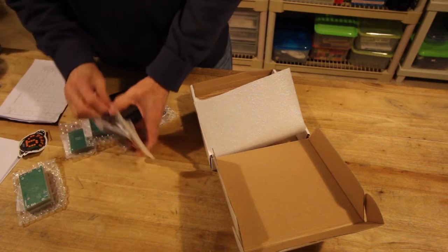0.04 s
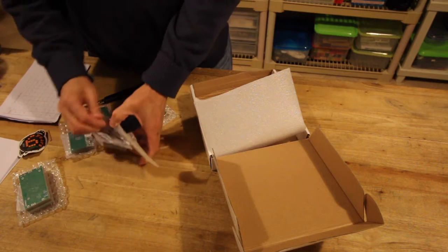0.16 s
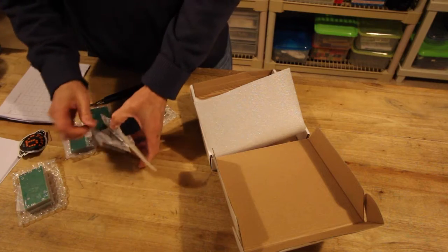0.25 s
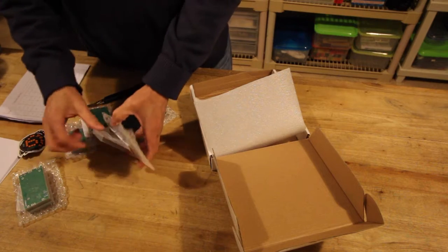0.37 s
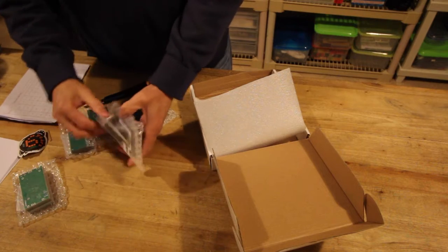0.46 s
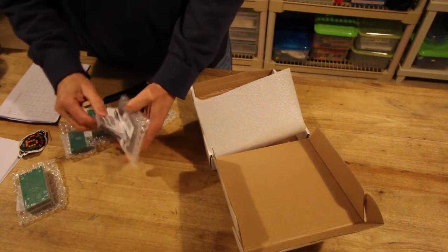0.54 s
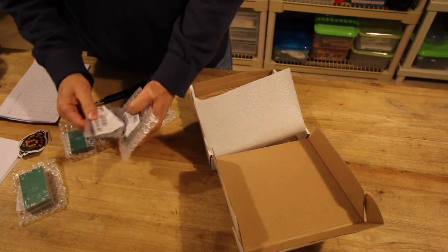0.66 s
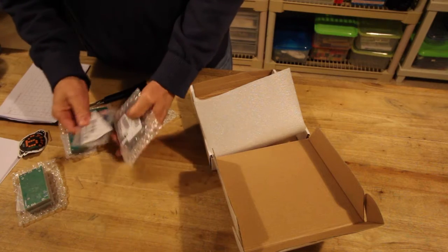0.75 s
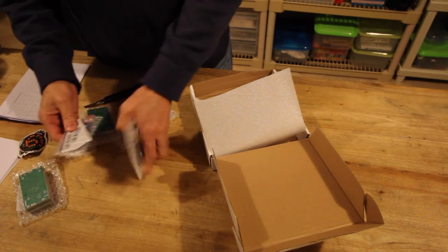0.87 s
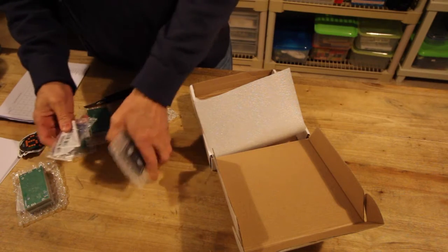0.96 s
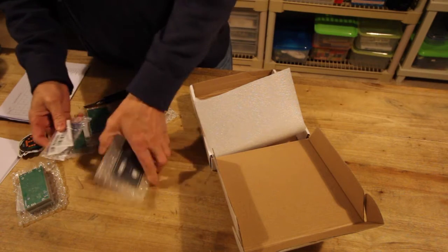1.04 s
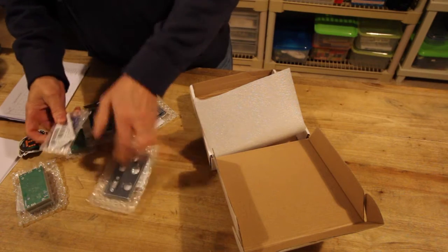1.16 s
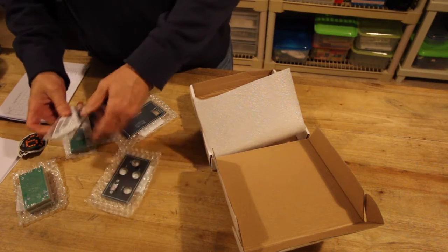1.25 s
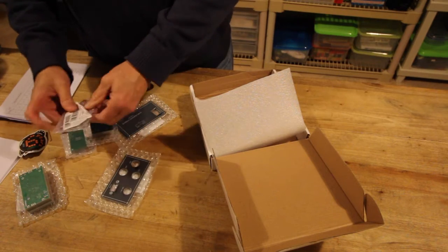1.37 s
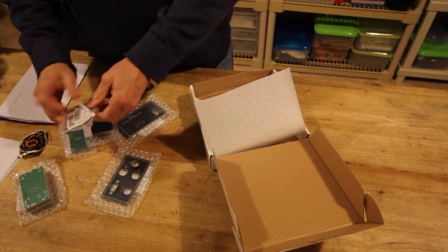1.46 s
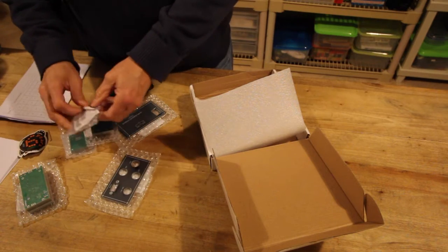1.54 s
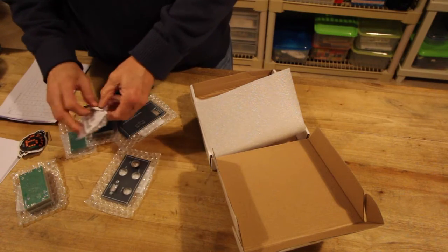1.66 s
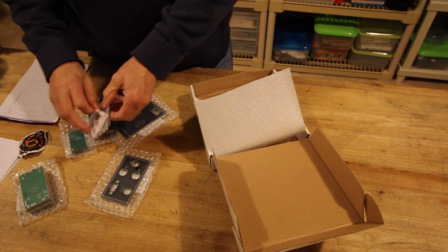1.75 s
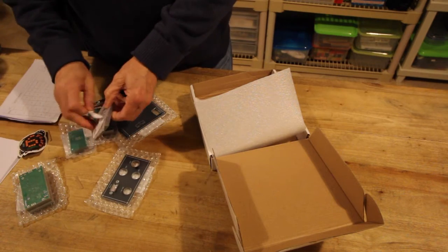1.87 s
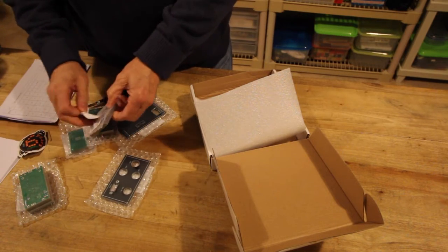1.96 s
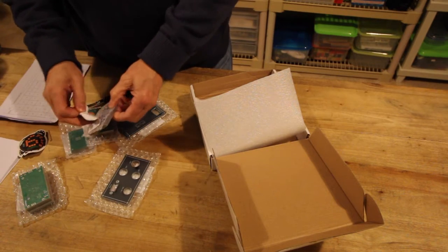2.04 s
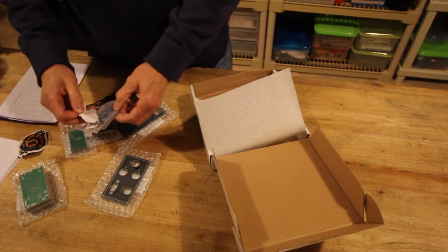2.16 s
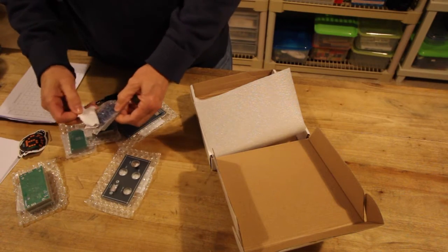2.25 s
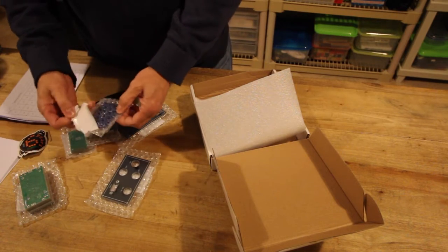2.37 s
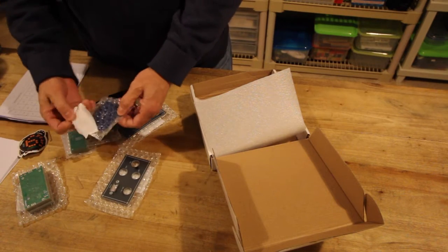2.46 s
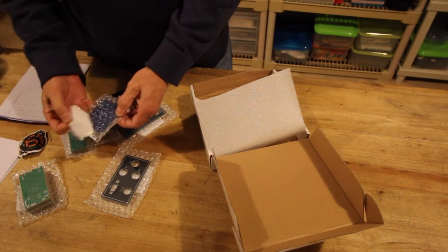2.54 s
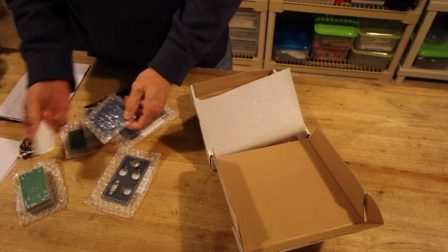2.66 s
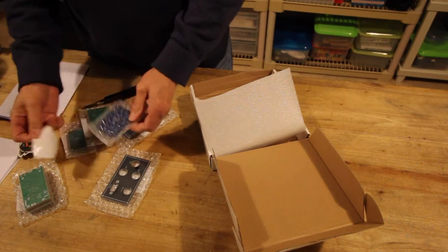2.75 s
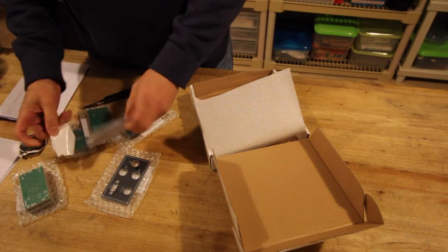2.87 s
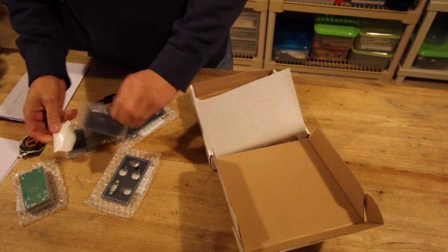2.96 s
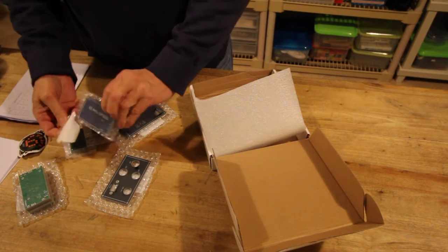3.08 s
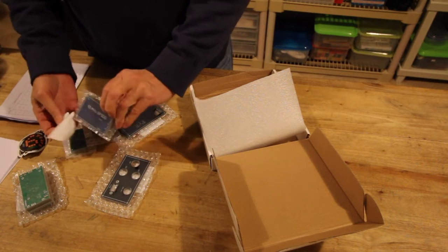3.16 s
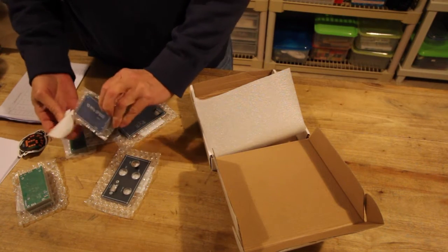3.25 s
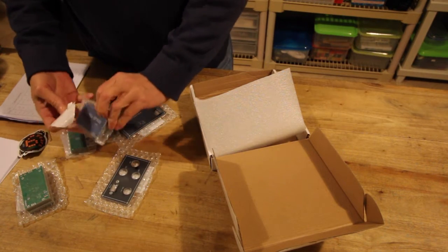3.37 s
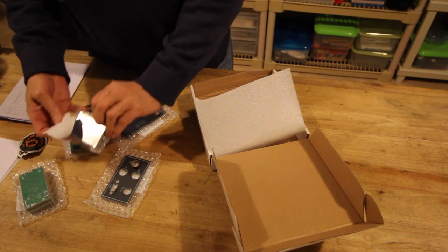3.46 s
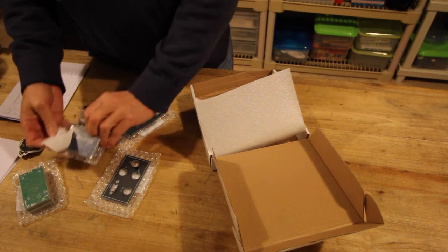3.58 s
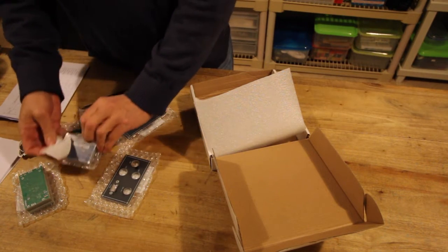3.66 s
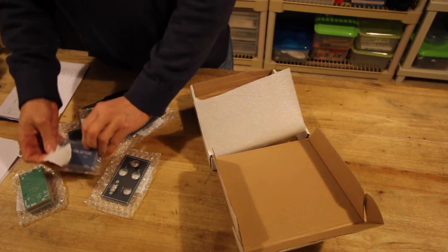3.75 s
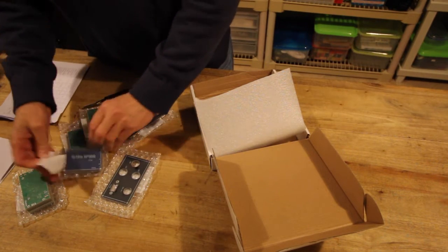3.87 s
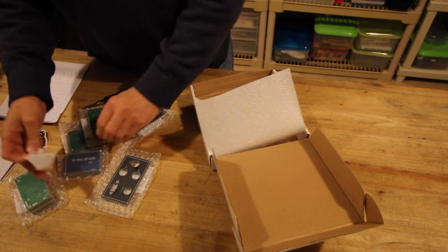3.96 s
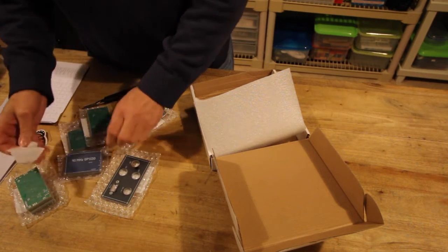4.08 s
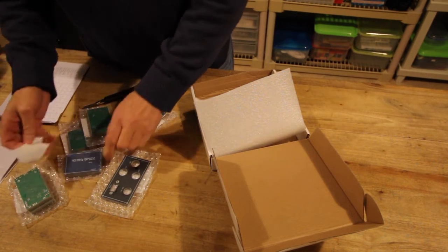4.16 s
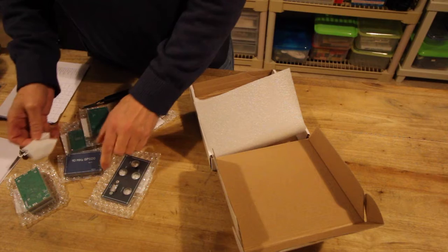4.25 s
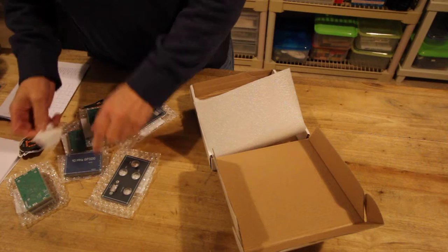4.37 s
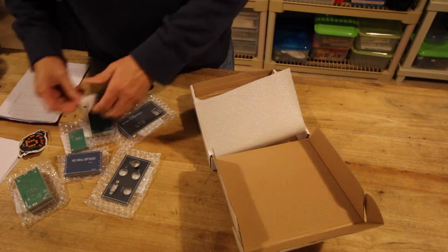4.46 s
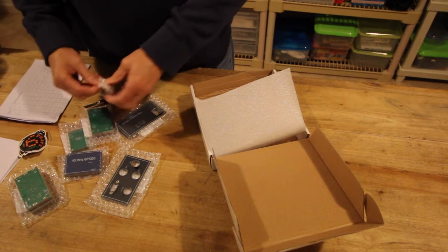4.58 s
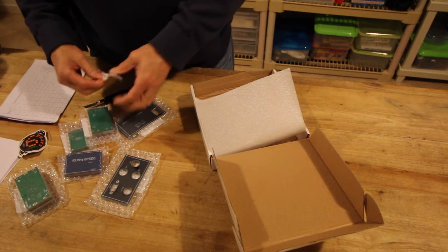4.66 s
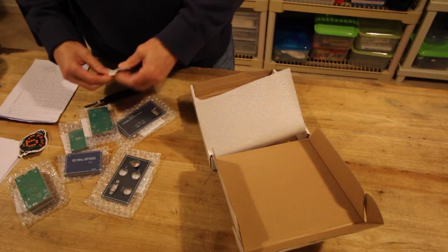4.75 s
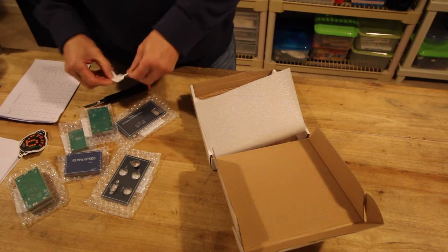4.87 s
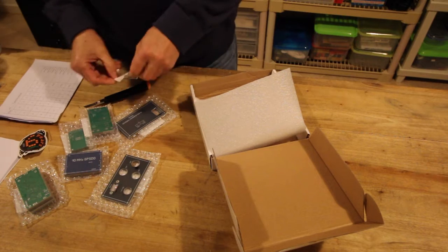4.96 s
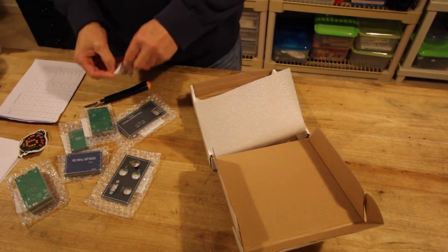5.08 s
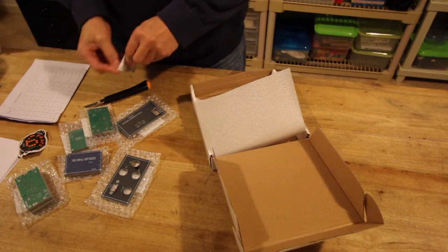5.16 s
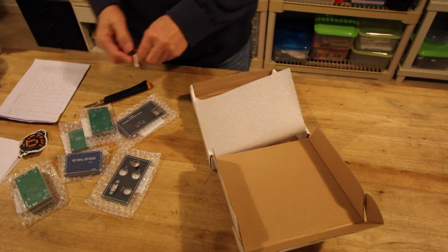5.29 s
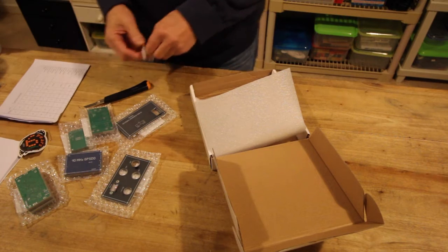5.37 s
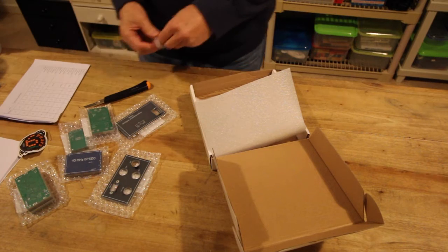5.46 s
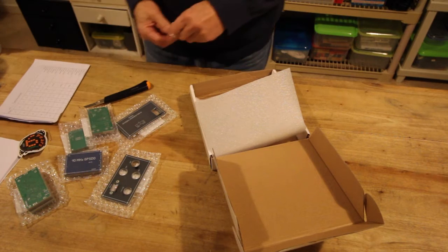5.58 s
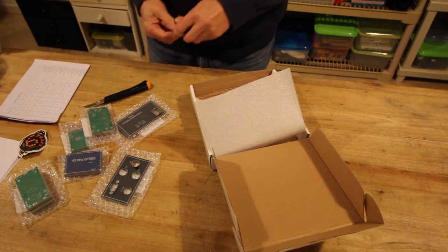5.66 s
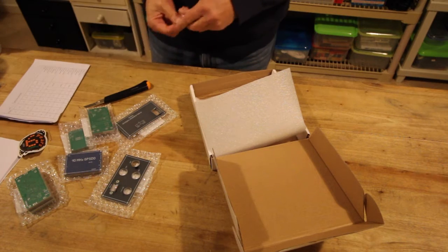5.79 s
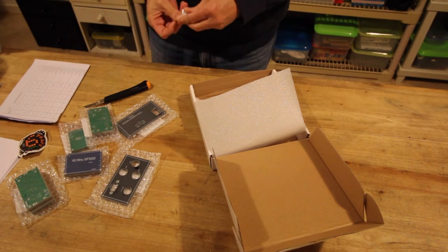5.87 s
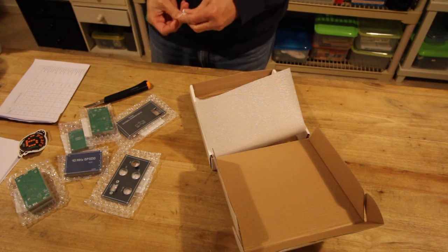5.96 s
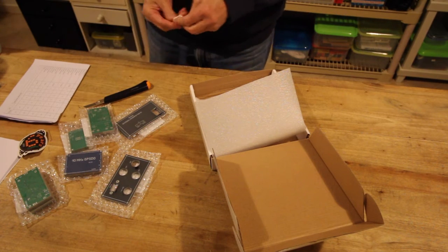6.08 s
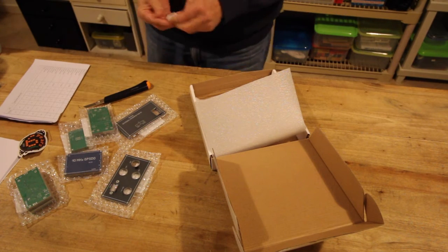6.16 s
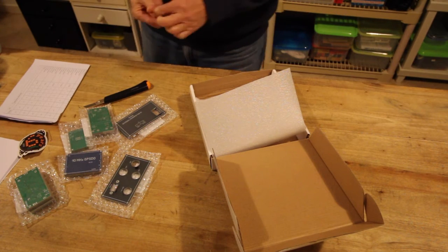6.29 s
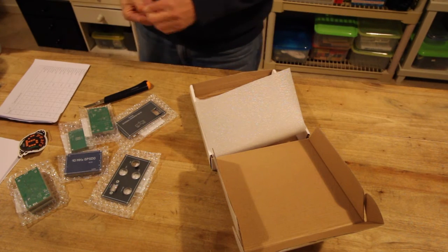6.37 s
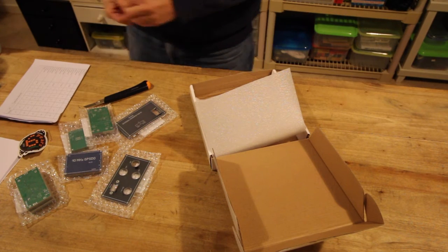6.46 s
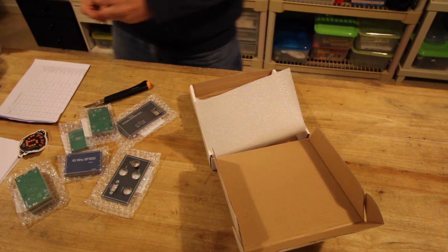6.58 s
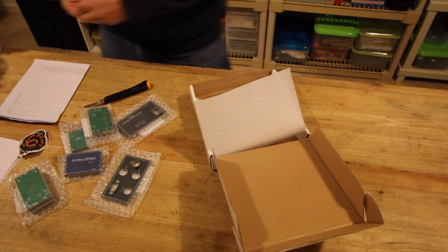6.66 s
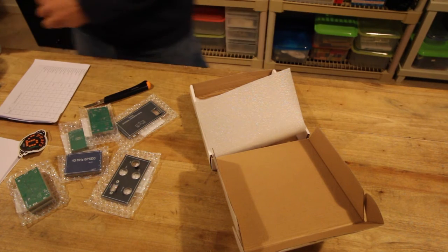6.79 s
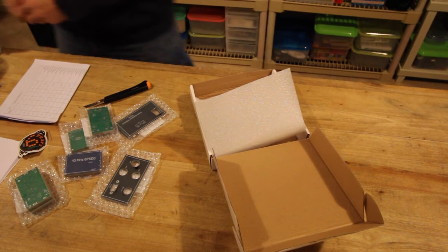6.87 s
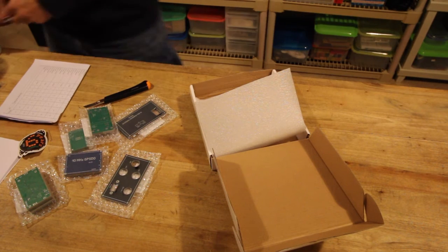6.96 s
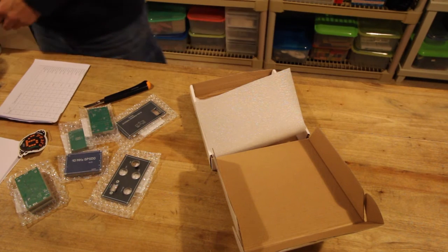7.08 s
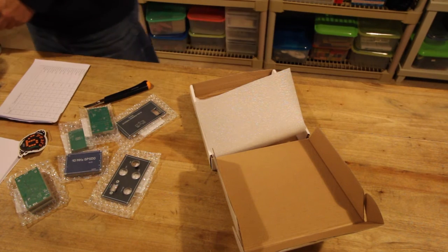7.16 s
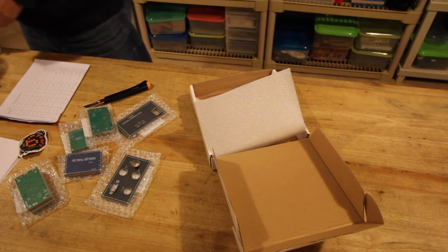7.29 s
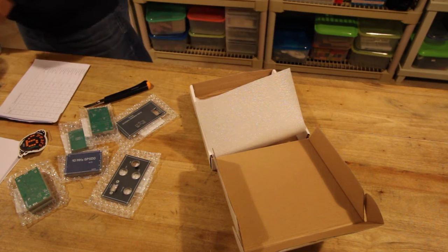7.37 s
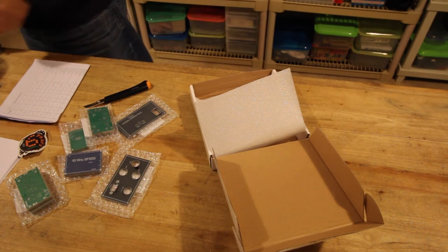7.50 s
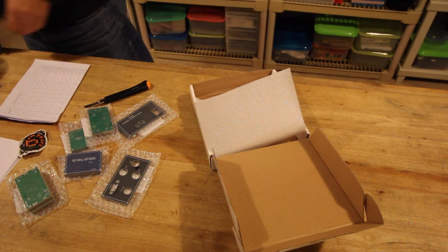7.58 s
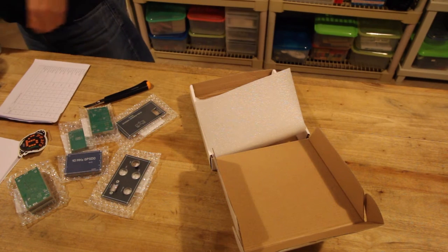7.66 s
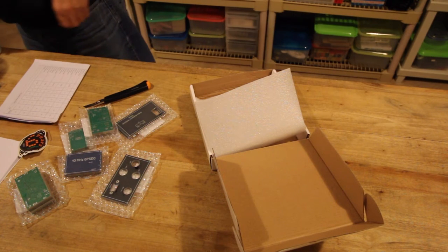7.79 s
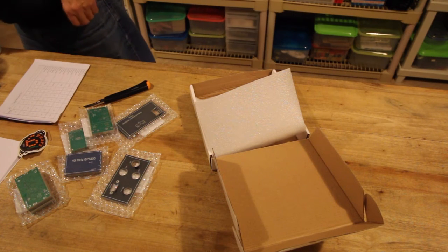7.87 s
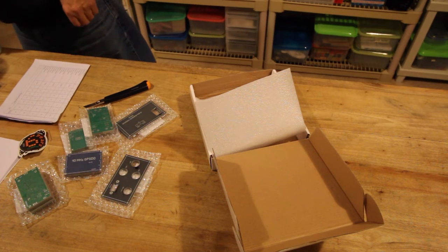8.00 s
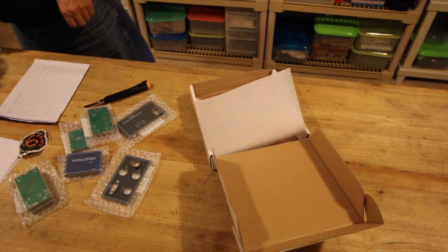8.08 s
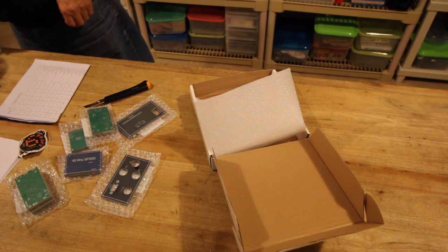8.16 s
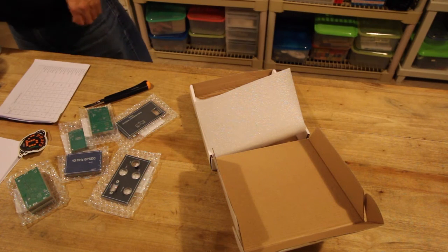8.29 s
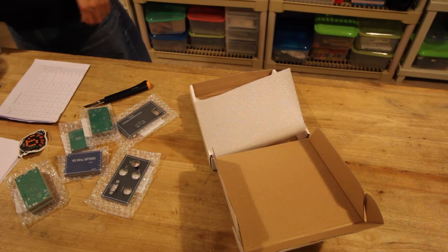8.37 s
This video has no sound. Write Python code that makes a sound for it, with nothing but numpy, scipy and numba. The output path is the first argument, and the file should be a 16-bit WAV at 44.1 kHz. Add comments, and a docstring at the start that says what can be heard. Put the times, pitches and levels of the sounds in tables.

```python
"""Workshop, wooden bench: hands pull bubble-wrap bags open, lay packets down and crumple a scrap of wrapping.
Film: each grip swells a swarm of tiny buckles; creases and sharp snaps ring patches, and the taut bag rings.
Packets click, ring and scuff; landings thud and excite bench-top modes; cloth noise swishes, swelling twice.
Early echoes and a noise tail form the room, over a low sine hum and faint coloured noise.
A limiter ducks everything under the loudest crackling."""
import sys
import numpy as np
from scipy import signal
from scipy.fft import rfft, irfft, next_fast_len
from scipy.io import wavfile
from scipy.ndimage import map_coordinates
from numba import njit

SR = 44100
rng = np.random.default_rng(int(sys.argv[2]) if len(sys.argv) > 2 else 0)


def output_pcm(signal):
    """Save a mono or channel-first signal as 16-bit PCM at the path in sys.argv[1].

    Samples are clipped to [-1, 1] before scaling.
    """
    pcm = np.clip(np.atleast_2d(signal).T, -1, 1) * 32767
    wavfile.write(sys.argv[1], SR, np.round(pcm).astype(np.int16))


N = 371762


def amp(db):
    """Amplitude factor of a level in dB."""
    return 10 ** (np.asarray(db) / 20)


def unit(x):
    """x scaled to rms 1."""
    return x / np.sqrt(np.mean(x ** 2) + 1e-20)


def along(points, hz):
    """(Hz, value) points interpolated on a log frequency axis."""
    f, v = np.transpose(points)
    return np.interp(np.log(hz + 1), np.log(f + 1), v)


def curves(rows):
    """One value per sample for each column after the time."""
    s, *cols = np.transpose(rows)
    return [np.interp(np.arange(N) / SR, s, c) for c in cols]


def wobble(knots_per_s):
    """Smooth random curve through normally distributed knots."""
    knots = rng.standard_normal(int(N * knots_per_s / SR) + 4)
    return map_coordinates(knots, [np.arange(N) * knots_per_s / SR], order=2)


def filtered(x, response):
    """x times a complex response of frequency."""
    m = next_fast_len(x.shape[-1] + SR // 4)
    spectrum = rfft(x, m) * response(np.fft.rfftfreq(m, 1 / SR))
    return irfft(spectrum, m)[..., :x.shape[-1]]


def noise(colour):
    """Noise of rms 1 with the given (Hz, dB) colour."""
    return unit(filtered(rng.standard_normal(N), lambda hz: amp(along(colour, hz))))


# likeness of diffuse sound at left and right: (frequency [Hz], coherence [0-1])
COHERENCE = [(60, 0.68), (250, 0.77), (1200, 0.62), (3000, 0.48), (8000, 0.28), (14000, 0.42)]


def diffuse(pair):
    """Two unrelated signals mix into left and right of a sound arriving from all sides."""
    def mid_side(hz):
        turn_rad = np.arccos(np.clip(along(COHERENCE, hz), -1, 1)) / 2
        return np.array([np.cos(turn_rad), np.sin(turn_rad)])

    mid, side = filtered(pair, mid_side)
    return np.array([mid + side, mid - side])


# low hum of something in the room: (frequency [Hz], rms level [dB])
HUM = [(56.5, -47.5), (134.6, -63), (195, -81.5)]
# colour of still air and hiss: (frequency [Hz], relative level [dB])
AIR_COLOUR = [(15, -11), (35, -10), (70, 1.5), (130, -0.5), (300, -2), (550, -8), (1100, -14.5),
              (2200, -18.5), (5000, -22), (9000, -26.5), (16000, -35.5)]


def background(air_db=-51.0):
    """Hum sines with slightly wandering phase, in faint diffuse noise."""
    t = np.arange(N) / SR
    hum = 0
    for hz, rms_db in HUM:
        phase_rad = 2 * np.pi * hz * t + .04 * wobble(3)
        hum = hum + np.sqrt(2) * amp(rms_db) * np.sin(phase_rad)
    return hum + amp(air_db) * diffuse(np.array([noise(AIR_COLOUR), noise(AIR_COLOUR)]))


# decay of the workshop's ring: (frequency [Hz], t60 [s])
ROOM_DECAY = [(150, 0.41), (600, 0.39), (2500, 0.49), (6000, 0.47), (14000, 0.24)]


def room_tail(build_up_s=0.00057):
    """Stereo noise of left energy 1 that builds up quickly and decays at a rate set by frequency."""
    hz, t, z = signal.stft(rng.standard_normal((2, SR * 5 // 8)), SR, nperseg=256)
    decay = amp(-60 * t / along(ROOM_DECAY, hz)[:, None])
    tail = signal.istft(z * decay, SR, nperseg=256)[1]
    build_up = 1 - np.exp(-np.arange(tail.shape[1]) / SR / build_up_s)
    tail = diffuse(tail * build_up)
    return tail / np.linalg.norm(tail[0])


def workshop(x, tail_db=-2, bounce=.48, wall=0.17, blocks=80):
    """A strong early bounce, four wall echoes and the tail, redrawn at random in equal blocks of time."""
    out, step = np.zeros((2, N + 2 * SR)), N // blocks + 1
    for start in range(0, N, step):
        answer = amp(tail_db) * room_tail()
        bounce_s = rng.uniform(.005, .0057)
        answer[:, round(SR * bounce_s)] += bounce
        walls_s = rng.uniform(.002, 0.027, size=4)
        for side in answer:
            # each echo reaches the two sides a moment apart
            arrival_s = walls_s + rng.uniform(0, .00012, size=4)
            side[(SR * arrival_s).astype(int)] += wall
        wet = signal.fftconvolve(x[None, start:start + step], answer, axes=1)
        out[:, start:start + wet.shape[1]] += wet
    return out[:, :N]


# packets and hands landing: (time [s], relative ring level [dB], relative thud level [dB])
LANDINGS = [(.243, -52, -48), (1.164, -45, -32), (1.196, -32.5, -38), (1.295, -25, -34), (1.335, -27, -39),
            (3.967, -39, -37.5)]
# bench-top modes: (frequency [Hz], relative level [dB], t60 [s])
BENCH_MODES = [(127, -14, 0.19), (163.6, -2, 0.86), (195.3, -0.5, 0.29), (290, -10, 0.32),
               (395.4, -17, 0.39), (454, -11, 0.22), (594, -22, .15)]
# colour of the soft thud: (frequency [Hz], relative level [dB])
THUD_COLOUR = [(30, -18), (85, 1), (130, 14), (200, 4), (270, 7.5), (380, -10), (600, -40), (2000, -70)]


def bench(ring_trim_db=-4.5, mode_scatter_db=2.4, thud_t60_s=0.18, onset_s=0.0031):
    """Each landing is a decaying noise thud plus bench-top modes of slightly random strength."""
    out, t = np.zeros(N + SR), np.arange(SR * 3 // 4) / SR
    thuds = noise(THUD_COLOUR)
    for s, ring_db, thud_db in LANDINGS:
        ring = 0
        for hz, mode_db, t60_s in BENCH_MODES:
            decay_db = mode_db + rng.normal(0, mode_scatter_db) - 60 * t / t60_s
            ring = ring + amp(decay_db) * np.sin(2 * np.pi * hz * t)
        start = round(s * SR)
        thud = amp(thud_db - 60 * t / thud_t60_s) * thuds[start:][:len(t)]
        landing = amp(ring_db + ring_trim_db) * ring + thud
        out[start:][:len(t)] += landing * (1 - np.exp(-t / onset_s))
    return out[:N]


# cloth swishing as the handler steps away: (time [s], level [dB])
STEP_AWAY = [(6.85, -59), (7.04, -58), (7.07, -51), (7.16, -56), (7.24, -46.5), (7.32, -52), (7.4, -79),
             (7.6, -91)]
# colour of the cloth: (frequency [Hz], relative level [dB])
CLOTH_COLOUR = [(100, -11), (700, -8), (1200, -7), (1750, -4.5), (2350, -1.5), (3300, -8), (4200, -10),
                (5700, -8), (9000, -14.5), (16000, -35)]


def clothing(rough_db=3.0):
    """Cloth slides over cloth: randomly roughened coloured noise in a soft swish that swells twice."""
    s, db = np.transpose(STEP_AWAY)
    level_db = np.interp(np.arange(N) / SR, s, db, left=-120)
    return amp(level_db) * unit(noise(CLOTH_COLOUR) * amp(rough_db * wobble(250)))


STROKE_SWING_DB, STROKE_CURVE = 19.5, 1.24  # level change over a rise or fall; roundness of the top


def strokes(peak_s, rise_s, fall_s, db):
    """Hand moves swell and let go by one rule; gives loudest level in dB and leading move, per sample."""
    t = np.arange(0, N, 32) / SR
    since_s = t[:, None] - peak_s
    away = np.abs(since_s / np.where(since_s < 0, rise_s, fall_s))
    level_db = db - STROKE_SWING_DB * away ** STROKE_CURVE
    rows = np.column_stack([t, level_db.max(axis=1), level_db.argmax(axis=1)])
    loudest_db, leader = curves(rows)
    return np.maximum(loudest_db, -120), np.round(leader).astype(int)


# packets and sleeves slide: (time of greatest speed [s], length [s], level [dB])
SLIDES = [(.26, .18, -50), (0.608, 0.14, -32), (0.837, .35, -51), (1.06, 0.2, -45), (1.21, 0.17, -66),
          (1.73, 0.062, -55), (1.915, .25, -40), (2.058, 0.1, -34), (2.32, 0.5, -56), (2.514, 0.085, -38.5),
          (2.641, 0.19, -28), (2.815, 0.46, -52.5), (3.22, 0.16, -46), (3.356, 0.28, -45),
          (3.984, .12, -56), (4.5, 0.089, -55.5), (4.65, 0.26, -51), (4.869, 0.16, -45), (5.052, 0.11, -51),
          (5.273, .25, -52), (5.616, 0.48, -55), (6.29, 0.12, -58), (6.828, .11, -45.5), (7.08, .16, -54)]
# colour of the scuff: (frequency [Hz], relative level [dB])
RUB_COLOUR = [(40, -11), (150, -17), (380, 2.5), (600, 1.5), (900, 6.5), (1300, -2.5), (2500, -14.5),
              (8000, -64)]


def rubbing(rise_share=0.36, catch_db=2.5):
    """Packets and sleeves slide: dull noise with an uneven level swells and fades."""
    s, length_s, db = np.transpose(SLIDES)
    rub_db, _ = strokes(s, rise_share * length_s, (1 - rise_share) * length_s, db)
    catching = amp(catch_db * wobble(180))
    return amp(rub_db) * unit(noise(RUB_COLOUR) * catching)


# colour of the film on top of each buckle's own pitch: (frequency [Hz], relative level [dB])
FILM_COLOUR = [(100, 3), (400, 8), (620, -0.5), (900, -0.5), (1350, 4), (2100, -2), (3100, -1), (5000, 0.5),
               (8500, -2), (12000, -5.5), (16000, -14)]


def causal(points, size):
    """Minimum-phase response of the given (Hz, dB) colour: it rings only after its cause."""
    cepstrum = irfft(np.log(amp(along(points, np.fft.rfftfreq(size, 1 / SR)))))
    cepstrum[1:size // 2] *= 2
    cepstrum[size // 2 + 1:] = 0
    return np.exp(rfft(cepstrum))


def buckles(times_s, sizes, pitch_hz, sharpness, cycles, flutter, size=384):
    """Each buckle is a jolt and a brief flutter, ringing a patch at its own pitch; sizes hold over 1 ms."""
    t, hz, pitch = np.arange(size) / SR, np.fft.rfftfreq(size, 1 / SR), pitch_hz[:, None]
    # low patches flutter for longer
    shake = rng.standard_normal((len(times_s), size)) * np.exp(-t / (cycles / pitch + 0.0013))
    push = 1 + flutter * rfft(shake / np.linalg.norm(shake, axis=1)[:, None])
    # bending waves are slower at low pitch, which smears the jolt
    travel = np.exp(-2j * np.pi * np.sqrt(hz / 1500))
    width_hz = pitch / np.reshape(np.maximum(sharpness, .15), (-1, 1))
    patch = 1j * hz * width_hz / (pitch ** 2 - hz ** 2 + 1j * hz * width_hz)
    waves = irfft(push * travel * patch ** 2 * causal(FILM_COLOUR, size))
    gain = sizes * np.sqrt(SR / 1000) / np.linalg.norm(waves, axis=1)
    waves *= gain[:, None]
    at = np.round(np.abs(times_s) * SR).astype(int)[:, None] + np.arange(size)
    return np.bincount(at.ravel(), waves.ravel(), N)[:N]


# stiff packets tap the bench or each other: (time [s], click level over 1 ms [dB])
TAPS = [(.243, -16), (1.164, -10), (2.66, -11.5), (3.174, -22), (3.224, -21), (3.924, -19), (4.606, -33.5),
        (5.057, -39), (6.825, -43)]
# packet modes: (frequency [Hz], relative level [dB], t60 [s])
PACKET_MODES = [(724, -4, 0.03), (850, -3, .07), (1270, -15, 0.07), (1320, 8.5, 0.048)]


def taps(click_hz=1320, ring_db=-19.5, mode_scatter_db=1.8):
    """A packet clicks as it touches, and its modes ring briefly, damped by its bag."""
    s, db = np.transpose(TAPS)
    out, t = np.zeros(N + SR), np.arange(SR // 6) / SR
    for start_s, tap_db in TAPS:
        ring = 0
        for hz, mode_db, t60_s in PACKET_MODES:
            decay_db = mode_db + rng.normal(0, mode_scatter_db) - 60 * t / t60_s
            ring = ring + amp(decay_db) * np.sin(2 * np.pi * hz * t)
        out[round(start_s * SR):][:len(t)] += amp(tap_db + ring_db) * ring
    pitch_hz = np.full(len(s), click_hz)
    clicks = buckles(s, amp(db), pitch_hz, sharpness=0.53, cycles=0.53, flutter=1.2)
    return out[:N] + clicks


# fingers squeeze or pull: (time of greatest force [s], rise [s], fall [s], level [dB], pitch [Hz])
GRIPS = [(0.098, 0.22, 0.47, -42.5, 3330), (0.262, 0.12, 0.16, -37, 1510), (0.554, 0.0053, 0.024, -8, 2700),
         (.598, 0.034, 0.044, -8.5, 2450), (.665, 0.053, 0.034, -13, 2400), (.93, 0.14, 0.14, -41.5, 2480),
         (1.061, 0.065, 0.2, -35, 1740), (1.185, 0.045, 0.14, -25.5, 1840),
         (1.35, 0.15, 0.085, -33.5, 1880), (1.58, 0.028, 0.084, -38.5, 2180),
         (1.74, 0.077, 0.16, -41, 2400), (1.833, 0.0065, 0.3, -14.5, 3000), (1.951, 0.11, 0.15, -8, 3300),
         (2.11, .02, 0.053, -20, 3630), (2.173, 0.035, 0.042, -14.5, 3900),
         (2.324, 0.036, 0.062, -12, 3150), (2.52, .08, 0.025, -38, 2760),
         (2.652, 0.061, 0.061, -11.5, 3470), (2.92, 0.17, 0.18, -45.5, 3500),
         (3.23, 0.065, 0.096, -38, 1700), (3.345, .04, 0.12, -47.5, 3940),
         (3.61, 0.018, 0.026, -39.5, 3700), (3.95, 0.074, 0.11, -33.5, 1990),
         (4.39, 0.019, 0.044, -48.5, 2480), (4.48, 0.037, 0.11, -48.5, 3600),
         (4.635, 0.019, 0.075, -46, 3500), (4.73, 0.043, .04, -45.5, 3020),
         (4.835, 0.026, 0.094, -39, 3800), (5.275, 0.07, 0.079, -41.5, 3800), (5.48, 0.1, 0.17, -44, 5100),
         (5.645, 0.15, 0.12, -42, 3900), (5.88, 0.016, 0.054, -43, 5800), (6.11, 0.051, 0.092, -49, 5800),
         (6.29, 0.062, 0.1, -46.5, 5800), (6.5, 0.082, 0.14, -45.5, 5270),
         (6.67, 0.038, 0.093, -50.5, 5030), (7.15, 0.26, 0.38, -51.5, 4300),
         (8.425, 0.022, .05, -38.5, 2190)]
# faint rustle of film merely held: (time [s], level [dB])
HELD = [(0, -46), (3.0, -51.5), (3.7, -59), (4.2, -66), (5.1, -57), (5.8, -61), (6.4, -61), (7.35, -58),
        (7.6, -71)]


def crinkle(scatter_db=5, pitch_spread=0.3, count=4600):
    """A swarm of tiny buckles whose level and pitch follow the grips, over a held-film floor."""
    s, rise_s, fall_s, db, pitch_hz = np.transpose(GRIPS)
    grip_db, grip = strokes(s, rise_s, fall_s, db)
    level_db = np.maximum(grip_db, curves(HELD)[0])
    at = rng.integers(0, N, count)
    size, detune = np.clip(rng.standard_normal((2, count)), -1.5, 1.5)
    pitch = np.clip(pitch_hz[grip[at]] * np.exp(pitch_spread * detune), 300, SR / 3)
    swarm = buckles(at / SR, amp(scatter_db * size), pitch, sharpness=0.42, cycles=1.26, flutter=0.93)
    return amp(level_db) * unit(swarm)


# stretch of the bag between the hands: (time [s], tension [0-1])
TENSION = [(.5, 0.8), (.58, 0.47), (.8, 0.8), (.95, 0.05), (1.75, 0), (1.83, 0.95), (2.45, 0.89),
           (2.65, 0.7), (2.9, 0)]


def creases(above_grip_db=6, scatter_db=1.5, pitch_spread=0.19, count=760):
    """While the bag is taut, middling creases give way in an uneven run, scaled by grip and tension."""
    s, rise_s, fall_s, db, pitch_hz = np.transpose(GRIPS)
    grip_db, grip = strokes(s, rise_s, fall_s, db)
    at = ((np.arange(count) + rng.random(count)) * N / count).astype(int)
    size, detune = np.clip(rng.standard_normal((2, count)), -1.5, 1.5)
    tension = np.clip(curves(TENSION)[0][at], 0, 1)
    sizes = tension * amp(grip_db[at] + above_grip_db + scatter_db * size)
    pitch = pitch_hz[grip[at]] * np.exp(pitch_spread * detune)
    return buckles(at / SR, sizes, pitch, sharpness=1.0, cycles=1.0, flutter=1.3)


# snaps that stand out: (time [s], level over 1 ms [dB], pitch [Hz], resonance sharpness [Q])
SNAPS = [(0.541, -4.5, 3000, 0.88), (.55, -1, 2100, 0.33), (0.588, 6, 2230, 1.17), (.603, 3, 2250, 1.9),
         (0.665, -6.5, 2600, 0.22), (0.911, -29.5, 3300, 0.85), (1.021, -28.5, 3270, 0.51),
         (1.131, -24, 3080, 0.25), (1.181, -14.5, 2220, 0.45), (1.277, -14.5, 1930, 3.6),
         (1.297, -14, 1590, 0.32), (1.443, -28.5, 3330, 0.5), (1.535, -25.5, 1590, .5),
         (1.798, -16.5, 4870, 0.68), (1.826, -4.5, 3100, 0.62), (1.843, -3.5, 4200, 0.27),
         (1.901, 2.5, 2650, 0.76), (1.921, 0.5, 2870, 1.5), (1.958, 3, 3800, 0.97), (2.004, 6, 2720, 0.58),
         (2.054, -2.5, 3370, 0.39), (2.102, 1, 3500, 0.66), (2.165, 0.5, 4550, 1.2),
         (2.222, -5.5, 3660, 0.36), (2.269, -3.5, 3990, .8), (2.287, -2.5, 3240, 0.54),
         (2.301, 0, 3000, 0.88), (2.317, 2, 2720, 0.52), (2.333, 7.5, 2980, 1.1), (2.349, 4, 2870, .4),
         (2.571, -1, 2650, 0.66), (2.577, -1.5, 3700, .55), (2.619, -2, 2800, 0.63), (2.629, 0, 3280, 0.69),
         (2.657, -3, 2670, 0.43), (2.879, -25.5, 2660, 0.53), (3.025, -25.5, 2040, 0.47),
         (3.311, -9.5, 2260, 0.47), (3.366, -15.5, 2540, .6), (3.616, -36, 2300, .6),
         (3.892, -27, 2120, 0.63), (4.469, -27, 3040, 0.27), (4.654, -22, 3100, 1.24),
         (4.735, -34, 2800, 1.1), (4.815, -25.5, 5000, 0.94), (4.832, -20, 2950, 0.87),
         (4.99, -38.5, 2450, 0.88), (5.27, -18, 3830, 0.51), (5.612, -23, 2380, 0.78),
         (5.625, -17.5, 4200, 4.7), (5.65, -16.5, 4050, 0.44), (5.803, -30.5, 7100, 0.7),
         (5.866, -29, 6700, .4), (6.043, -31, 7000, 0.39), (6.074, -27, 6900, 0.77),
         (6.115, -27, 6240, 0.65), (6.285, -22.5, 6150, 1.2), (6.666, -34.5, 7140, 0.38),
         (7.037, -39.5, 8100, .8), (7.092, -31, 6600, 1.1), (7.413, -42, 6350, 1.6)]


def snaps():
    """Big creases and bubbles flip over one by one, each a strong buckle."""
    s, db, pitch_hz, sharpness = np.transpose(SNAPS)
    return buckles(s, amp(db), pitch_hz, sharpness, cycles=0.6, flutter=1.94)


# colour of the taut bag: (frequency [Hz], relative level [dB])
TAUT_COLOUR = [(300, -7), (900, -4), (1400, -5), (2000, -6), (2600, -0.5), (3150, -0.5), (4200, -5.5),
               (6000, -4), (12000, -2.5)]


def stretched(film):
    """Tension crossfades the film into the colour of the taut bag, like a small drum skin."""
    tension = np.clip(curves(TENSION)[0], 0, 1)
    taut = filtered(film, lambda hz: amp(along(TAUT_COLOUR, hz)))
    return (1 - tension) * film + tension * taut


# phase difference between left and right, by frequency: (frequency [Hz], phase [rad])
SIDE_PHASE = [(0, 0), (2500, -1.21), (4650, 0.81), (9910, 0.87), (13700, 0.98), (16100, -0.1)]


def direct(x):
    """Phase and level differ between the sides by frequency; treble is louder on the left."""
    # (Hz, dB gained on the left and lost on the right)
    shade = [(300, -1.6), (1000, -1.0), (2500, 0.49), (4500, 1.0), (9000, 0.5)]

    def sides(hz):
        left = amp(along(shade, hz)) * np.exp(.5j * along(SIDE_PHASE, hz))
        return np.array([left, 1 / left])

    return filtered(x, sides)


def scene():
    """Film, taps, scuffs, cloth and bench in the room, over the hum."""
    film = stretched(snaps() + creases() + crinkle())
    handling = film + taps() + rubbing() + clothing()
    wood = bench()
    wood_sides = wood * amp([[-1], [1]])  # bench leans right
    return direct(handling) + wood_sides + workshop(handling + .5 * wood) + background()


@njit
def follow(x, rise, fall):
    """Envelope follower with rise and fall times in samples."""
    out, level = np.zeros(len(x)), 0.
    for i in range(len(x)):
        level += (x[i] - level) / (rise if x[i] > level else fall)
        out[i] = level
    return out


def record(dry, threshold_db=-19, release_s=0.032, slow_share=0.72, top_hz=16300):
    """A limiter ducks and recovers fast but lingers after long overloads; peaks clip; the band ends."""
    window, attack = .006 * SR, .0005 * SR
    power = follow(np.mean(dry ** 2, axis=0), window, window)
    over_db = np.maximum(10 * np.log10(power + 1e-12) - threshold_db, 0)
    fast_db = follow(over_db, attack, release_s * SR)
    slow_db = follow(slow_share * fast_db, .25 * SR, .6 * SR)
    limited = np.clip(dry * amp(-np.maximum(fast_db, slow_db)), -1, 1)
    return filtered(limited, lambda hz: hz < top_hz)


dry = scene()
out = record(dry)
output_pcm(out)
```